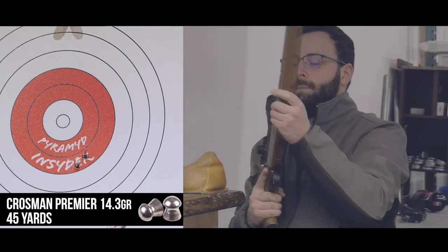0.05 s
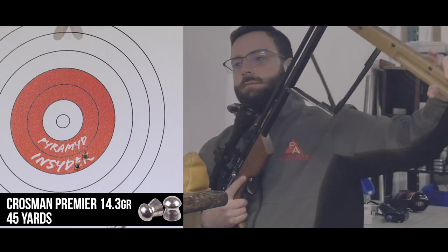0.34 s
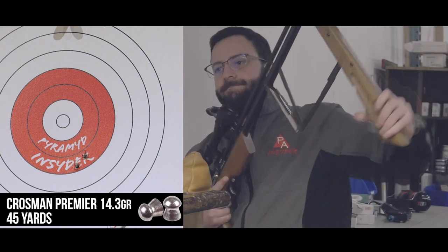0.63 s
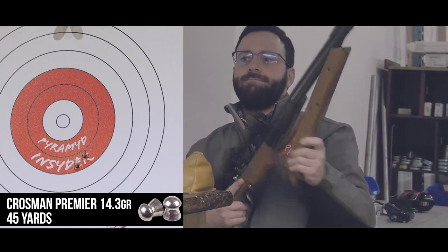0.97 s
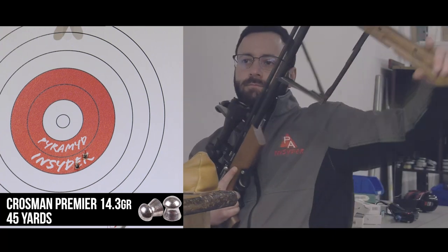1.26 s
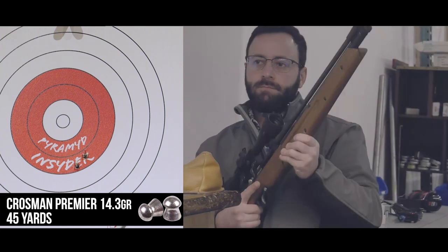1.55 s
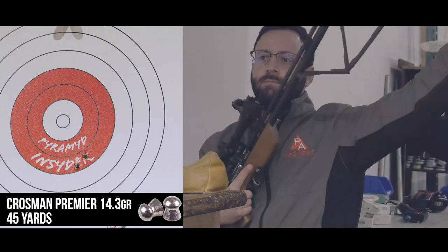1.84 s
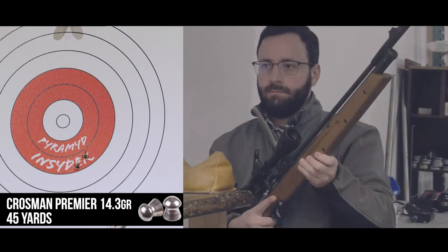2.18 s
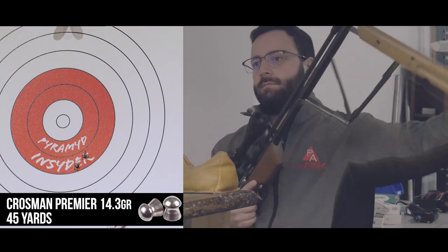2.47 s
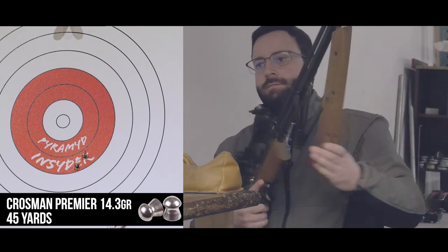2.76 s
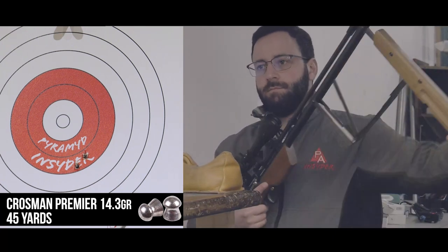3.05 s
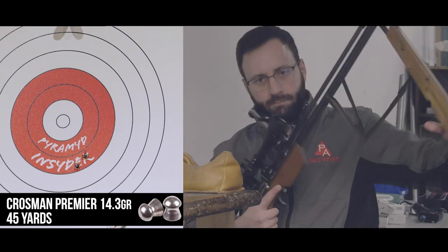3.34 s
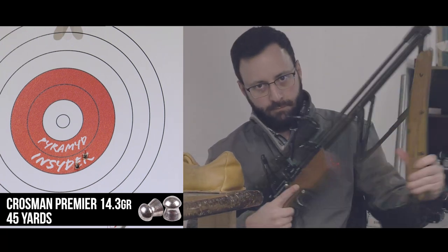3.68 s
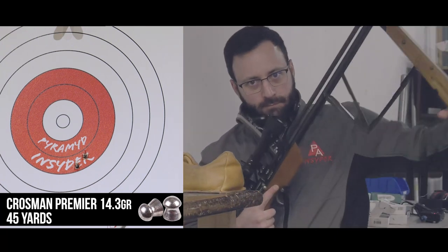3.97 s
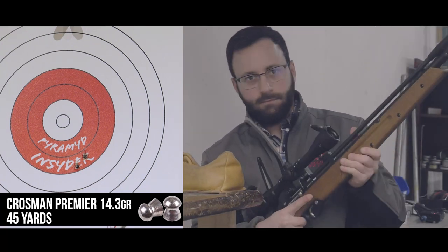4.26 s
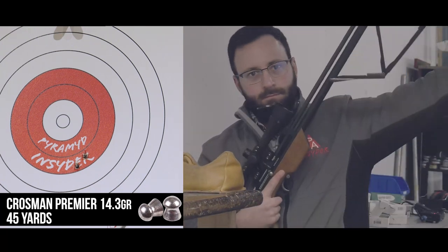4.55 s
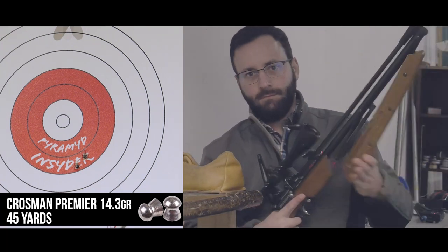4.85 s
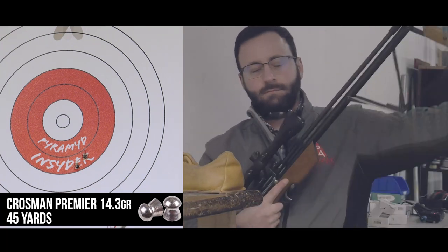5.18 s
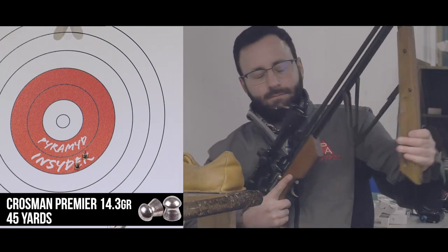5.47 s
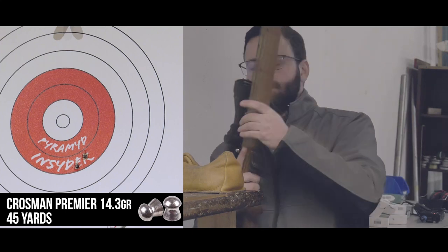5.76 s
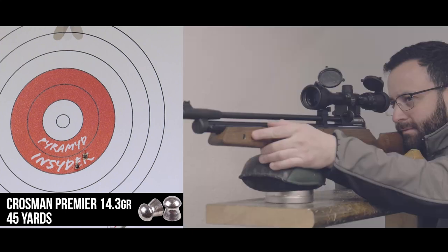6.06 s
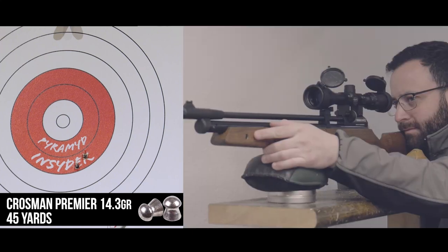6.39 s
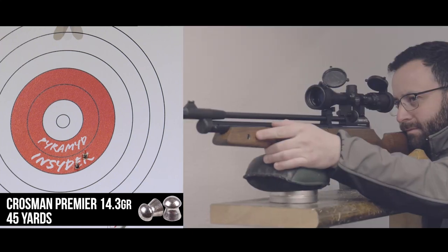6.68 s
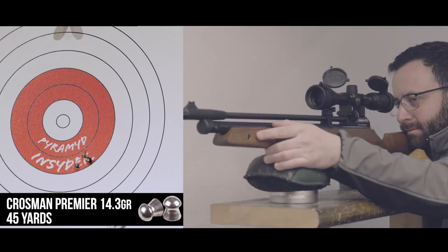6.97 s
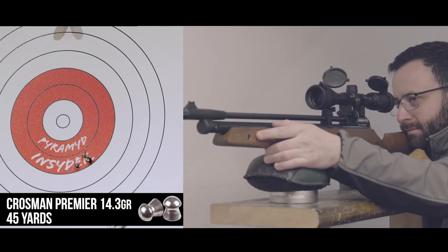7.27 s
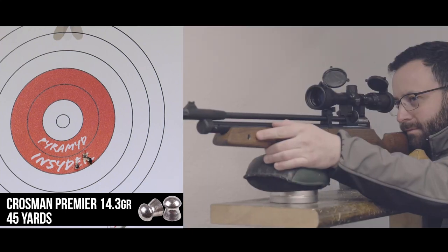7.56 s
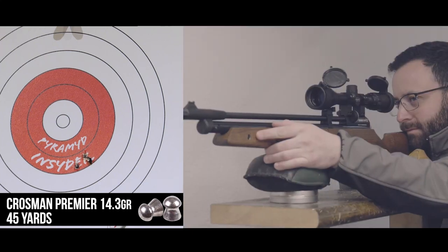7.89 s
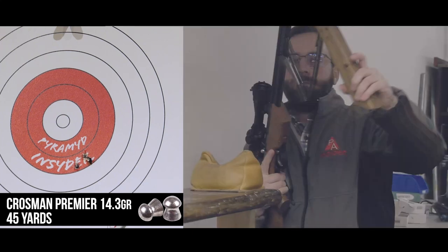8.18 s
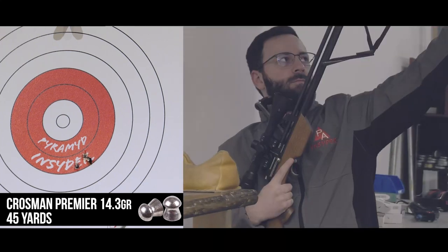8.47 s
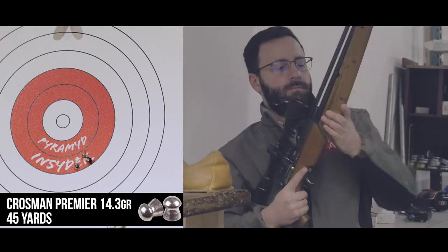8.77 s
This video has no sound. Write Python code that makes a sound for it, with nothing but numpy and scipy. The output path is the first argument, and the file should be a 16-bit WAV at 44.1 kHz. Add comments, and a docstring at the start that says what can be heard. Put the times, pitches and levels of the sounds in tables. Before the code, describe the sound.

An air rifle is pumped eight times, close by in a small room, from about 0.2 to 5.7 seconds, roughly one stroke every 0.7 seconds. In each stroke the lever snaps open, its steel links tick, it clacks against its stop, then the wooden grip slaps shut more loudly with a short, faintly whistling rush of air. Soft dull knocks come around 6 seconds, then a brief lull. At 6.8 seconds the rifle fires with a sharp pop, followed at 7 by the pellet's crack on the target. These are the loudest sounds, ringing and booming down a long indoor range. A distant trap clangs at 7.2, and light knocks follow around 7.5. At 8.1 one more close pump begins with a thin metallic ping and slaps shut at 8.8. A jacket rustles faintly during the pumping, and soft ventilation runs throughout.

```python
"""Pumping and firing an air rifle

An air rifle is pumped eight times, close by in a small room: the lever is pried open, its links tick,
it hits its stop, then it slaps shut and air rushes through the valve. The scene cuts to the shooting
bench, where one shot rings down a long indoor range; the pellet cracks on the target and clangs into
the far trap. Then it cuts back for one more pump. Clothes rustle and the ventilation blows softly."""
import sys
import numpy as np
from scipy import signal
from scipy.fft import rfft, irfft, next_fast_len
from scipy.io import wavfile
from scipy.ndimage import uniform_filter1d

SR = 44100
rng = np.random.default_rng(int(sys.argv[2]) if len(sys.argv) > 2 else 0)


def bounce(signal):
    """Save signal as a 16-bit WAV file at the path given by the first command-line argument."""
    frames = np.transpose(np.atleast_2d(signal))
    limited = np.clip(frames, -1, 1)
    pcm = np.round(limited * 32767).astype(np.int16)
    wavfile.write(sys.argv[1], SR, pcm)


N = 398223
TIME = np.arange(N) / SR
BENCH_FROM_S, BENCH_TO_S = 6.09, 8.125
CUTOFF_HZ = 16000

# A "t60" is the time a sound takes to fade by 60 dB. A higher "tilt" makes it brighter.
# Levels are starting points: the functions add their own gains and filters.
# The lever snaps out of its seat: (time [s], crack [dB], ring [dB], tilt [dB/octave],
# creak before it [s], delay of the link tick [s], tick [dB])
PRIES = [(0.2255, -28, -40, 0.5, 0.00052, .058, -53), (1.0326, -30, -42, -1, 0.036, 0.058, -35.5),
         (1.686, -29.5, -36, -1, 0.015, 0.08, -34.5), (2.3958, -25.5, -37.5, 2.5, 0.01, .078, -35.5),
         (3.0299, -22, -37.5, 4, 0.0085, .07, -34), (3.7219, -24.5, -35, 1, .01, 0.085, -34.5),
         (4.4089, -25.5, -34, 2.5, .007, .085, -34), (5.1121, -24.5, -34.5, 3.5, 0.0067, 0.081, -34),
         (8.1341, -27.5, -39, 3.5, 0, .058, -54)]
# The lever is fully open, and the slack links touch, then rebound: (time [s], crack [dB], ring [dB],
# tilt [dB/octave], delay of the rebound [s], touch [dB], rebound [dB])
STOPS = [(0.4805, -26.5, -27.5, 0.5, 0.12, -59, -38.5), (1.2049, -28.5, -32.5, 0.5, 0.081, -46, -36),
         (1.8714, -30, -31, 0.9, 0.076, -61, -36.5), (2.5712, -27.5, -32, 0.7, 0.079, -66, -44.5),
         (3.225, -28.5, -34, 0.6, .079, -57.5, -44), (3.887, -27, -30.5, 0.1, 0.059, -64, -43),
         (4.5902, -29.5, -35, 0.2, .0774, -63, -42), (5.2762, -28, -30.5, 0.5, 0.064, -43.5, -42),
         (8.4471, -33, -36.5, 0, 0.16, -74, -47)]
# The lever's wooden grip, the forearm, slaps shut: (time [s], crack [dB], ring [dB], tilt [dB/octave],
# link tick [dB], head start of the linkage [s], linkage [dB], knock [dB], valve [dB], valve hold [s])
CLOSES = [(0.8087, -26, -24.5, 2.5, -43, 0.0095, -18.5, -46, -44.5, 0.028),
          (1.4731, -18.5, -27.5, 2, -61, 0.0077, -20.5, -43, -46.5, .065),
          (2.1619, -19, -25.5, 0, -54, 0.01, -22.5, -39.5, -45, 0.028),
          (2.8601, -16.5, -29.5, 0.5, -52.5, 0.011, -23.5, -40, -45, 0.054),
          (3.5501, -17, -25.5, 1.5, -48, 0.0069, -21.5, -30.5, -46, 0.07),
          (4.2173, -14.5, -28, 0, -54, 0.0099, -24.5, -63, -46, 0.057),
          (4.9323, -22, -29.5, -1, -54.5, .0103, -19, -65, -45.5, 0.033),
          (5.6368, -14.5, -36, -2.5, -56, 0.007, -22, -35, -47.5, 0.071),
          (8.844, -21, -25, -1, -61, .015, -24.5, -64, -50.5, .019)]
# The first pull for each shot sets a steel part singing: (time [s], level [dB])
PINGS = [(0.226, -47), (8.135, -38)]
# The muzzle pops (first two rows), then the pellet hits the target (last two rows):
# (time [s], level [dB], t60 [s], tilt [dB/octave])
MUZZLE_AND_TARGET = [(6.8408, -15, 0.025, 2.5), (6.8447, -13.5, 0.026, 2), (6.9845, -11.5, 0.015, 2.5),
                     (6.9875, -25.5, 0.12, 3.5)]
# The shot slaps back from the near walls: (time [s], level [dB], t60 [s])
WALL_SLAPS = [(6.8595, -18.5, 0.04), (6.8625, -19, 0.084)]
# Pressure waves under the pop, the wall slap and the target hit:
# (time [s], level [dB], pitch [Hz], t60 [s])
BLASTS = [(6.8414, -11, 570, 0.01), (6.8607, -7, 1220, 0.0058), (6.985, -14, 416, 0.01)]
# The jacket rustles as the rifle is raised and lowered: (time [s], level [dB])
JACKET_RUSTLE = [(0, -68), (.1, -63.5), (.35, -68.5), (.9, -71), (5.4, -68.5), (5.75, -63.5), (5.93, -68),
                 (6.07, -66), (8.17, -62), (8.6, -73.5), (8.85, -62), (9.02, -85)]
# Sleeve and hand brush the stock: (time [s], level [dB], half length [s])
BRUSHES = [(0.176, -56, 0.0081), (0.322, -61, 0.0036), (0.354, -56.5, 0.0042), (0.387, -52, 0.0073),
           (0.455, -55.5, 0.017), (8.299, -52, 0.02), (8.337, -57.5, 0.0092)]
# Dull knocks on the bench and around the range: (time [s], level [dB], t60 [s], tilt [dB/octave])
KNOCKS = [(5.981, -43.5, 0.11, -0.5), (5.99, -48.5, 0.13, -2), (6.068, -51, 0.062, 4.5),
          (7.474, -53, 0.12, 9), (7.53, -45, 0.17, 8.5), (7.662, -57, 0.11, 9)]

# The tone of each sound, or how strong it is from bass to treble: (frequency [Hz], level [dB])
PRY_TONE = [(120, -64), (200, -41.5), (401, -19.5), (836, -15), (1060, -5.5), (1450, -11), (2420, -3.5),
            (4270, 0), (4860, -1.5), (7410, -5.5), (9580, -2.5), (14600, -4.5), (16000, -19.5)]
LINK_TONE = [(180, -47), (300, -9.5), (774, -10.5), (1140, 9), (1530, -9), (2400, 4.5), (3030, -6),
             (4230, 0.5), (6300, -6), (10900, -10.5), (14500, -5), (16000, -16.5)]
STOP_TONE = [(120, -52), (200, -19), (749, -8), (968, -11), (1180, 1.5), (1710, -4.5), (2130, -7),
             (2330, -1), (3690, -8), (5630, -7), (7270, -3), (9750, -8), (14900, -13.5), (16000, -20)]
CLOSE_TONE = [(150, -48), (250, -31.5), (831, -13.5), (1260, -4), (1790, -7.5), (3060, -1), (3910, -8.5),
              (4340, 1), (5350, -6.5), (5830, -2.5), (7570, -6.5), (9830, -3.5), (13900, -10), (16000, -18)]
VALVE_TONE = [(240, -54.5), (400, -23), (504, -23), (553, 4), (645, -26), (708, -5), (814, -13.5),
              (879, -5.5), (1650, -8), (3930, -1), (9470, -9.5), (13300, -18.5), (16000, -24.5)]
CRACK_TONE = [(18, -39), (30, -32), (584, 2.5), (1540, -6.5), (2290, -3.5), (3060, -10), (3400, -13),
              (4650, -8), (5450, -16.5), (6900, -11), (9460, -25.5), (10500, -25), (16000, -31)]
WALL_TONE = [(24, -43.5), (40, -13), (231, -6), (600, -2.5), (715, -19), (1070, 1.5), (1590, 1.5),
             (2440, -7), (2630, -6), (3930, -19.5), (5440, -10.5), (16000, -50)]
RANGE_TONE = [(35, -43.5), (60, -26), (193, -3), (308, -3.5), (363, -4), (566, -6), (991, -6.5),
              (1410, -3.5), (1950, -6), (2250, -6.5), (2970, -11.5), (5460, -12), (6430, -15),
              (16000, -41.5)]
BOOM_TONE = [(29, -63), (50, -34.5), (75, -32.5), (151, -6.5), (231, -4.5), (338, 4), (380, 1), (427, -11),
             (492, -1), (701, -7), (1530, -5.5), (2560, -8), (4010, -10), (7410, -22.5), (14000, -49)]
TRAP_TONE = [(240, -41), (400, -13.5), (593, -11.5), (690, -16), (780, -10), (1020, -10), (1140, -6),
             (1910, -4), (2250, -3.5), (3240, -9.5), (3770, -6.5), (6820, -15), (15000, -52.5)]
BRUSH_TONE = [(290, -31), (500, -5), (1280, -1), (1360, -6), (1750, 2), (3000, -4.5), (7100, -10.5),
              (16000, -14)]
KNOCK_TONE = [(100, -28), (300, -5.5), (600, -4), (1000, 4.5), (1600, -9.5), (4000, -24), (9000, -44.5),
              (15000, -70)]
ROOM_AIR_TONE = [(15, -39), (25, -5.5), (242, 3.5), (405, -0.5), (531, 5.5), (624, 0.5), (714, 3.5),
                 (863, 0), (988, -0.5), (1790, -7), (2480, -7), (3430, -20.5), (4490, -21.5), (14000, -18),
                 (16000, -48.5)]
BENCH_AIR_TONE = [(15, -52), (25, -21), (113, -9.5), (231, -10.5), (353, -8.5), (448, -15.5), (539, -12.5),
                  (584, -10), (632, -16), (684, -16), (824, -17), (1130, -21.5), (1230, -17.5), (1360, -21),
                  (14000, -49)]

# Notes that ring in the steel links, the closed rifle and the singing part. Narrow ones last longer:
# (pitch [Hz], width before damping [Hz], level [dB])
LINK_NOTES = [(1169, 43, -2.5), (1400, 31, -1.5), (1700, 44, -1.5), (1950, 41, -3.5), (2210, 140, -1.5),
              (3157, 140, 3), (3430, 39, -5), (3660, 140, 4), (4180, 17, -10.5), (4240, 40, -6.5),
              (5080, 100, -4), (5470, 71, -10), (6720, 13.3, -16), (6500, 59, -11), (7080, 120, -4.5),
              (7560, 54, -9), (8520, 100, -1), (9500, 10, -16.5), (9200, 140, -5.5), (9400, 45, -13)]
BODY_NOTES = [(1297, 110, -3.5), (2335, 49, -3.5), (2550, 29, -5), (2820, 60, 0), (3010, 150, 6.5),
              (3700, 46, 1), (4300, 500, 6), (4683, 100, 5), (4940, 120, 2.5), (5796, 480, 2.5),
              (6550, 98, -2.5), (8730, 99, -5.5)]
PING_NOTES = [(2430, 40, 3), (2650, 18, -1), (5870, 45, -10), (9410, 36, 0)]
# Notes of the air in the valve passage and across the range: (pitch [Hz], width [Hz], level [dB])
VALVE_NOTES = [(578, 48, -0.5), (883, 70, -6), (2570, 100, -0.5), (2800, 57, 3), (3090, 67, -4.5),
               (3550, 55, 0), (3860, 76, 0.5), (4677, 110, -9.5), (5040, 140, -8)]
RANGE_NOTES = [(166.6, 30, -3), (230, 18, -6.5), (269.5, 18, 2.5), (309, 24, -5), (363, 18.3, 1.5),
               (482, 18, -5.5)]

# How long sound lingers in each space: (frequency [Hz], t60 [s])
VALVE_DECAY = [(500, 0.54), (3000, 0.66), (7000, 0.46), (14000, 0.33)]
RANGE_DECAY = [(100, 1.77), (400, 0.38), (1500, 0.97), (5000, 0.96), (9000, 0.79), (14000, .35)]
TRAP_DECAY = [(500, 0.73), (1500, 0.3), (5000, 0.45), (12000, 0.23)]
ROOM_DECAY = [(200, 0.15), (2000, 0.46), (6000, 0.27), (14000, 0.087)]

# How wide each sound is in stereo: (frequency [Hz], sides against middle [dB])
RIFLE_SPREAD = [(200, 2), (600, -11.5), (1500, -33), (2700, -22.5), (5500, -10.5), (15000, -11)]
CRACK_SPREAD = [(300, 0), (1000, 0.5), (3000, -2.5), (7000, -7.5), (11000, 10), (15000, 2)]
WALL_SPREAD = [(200, -11), (1000, -18.5), (5000, -10)]


def lever_pry(slip_count=3, free_after_s=0.0055):
    """The catch creaks in small slips, snaps and springs free. A first pull has little or no creak."""
    hits = []
    for s, crack_db, ring_db, tilt, creak_s, *_ in PRIES:
        hits.append((s, crack_db, ring_db, tilt))
        if creak_s > 0:
            slips = np.linspace(s - creak_s, s, slip_count, endpoint=False)
            hits += [(slip, crack_db - 13.5, ring_db - 7, -0.95) for slip in slips]
            hits.append((s + free_after_s, crack_db - 7.5, ring_db, -0.46))
    return contacts(hits, PRY_TONE, BODY_NOTES, crack_t60=0.02, crack_tilt=0.97, clatter_t60=0.12,
                    clatter_tilt=-2.8, clatter_db=0.5, notes_db=-3.5, damping=0.42, scrape_db=-16)


def link_ticks(touch_share=0.665, before_slap_s=0.056):
    """The links tick when their load changes: after the pry, twice after the stop, before the slap."""
    ticks = [(s + delay, db) for s, *_, delay, db in PRIES]
    for s, *_, delay, touch_db, rebound_db in STOPS:
        ticks += [(s + touch_share * delay, touch_db), (s + delay, rebound_db)]
    ticks += [(s - before_slap_s, db) for s, _, _, _, db, *_ in CLOSES]
    hits = [(s, db, db - 5.5, 1.5) for s, db in ticks]
    return contacts(hits, LINK_TONE, LINK_NOTES, crack_t60=0.019, crack_tilt=0.44, clatter_t60=0.071,
                    clatter_tilt=0, clatter_db=4.5, notes_db=-5, damping=0.22, scrape_db=-15.5)


def lever_stop():
    """The lever clacks against its stop at the end of each opening swing."""
    hits = [row[:4] for row in STOPS]
    return contacts(hits, STOP_TONE, LINK_NOTES, crack_t60=0.015, crack_tilt=1, clatter_t60=0.068,
                    clatter_tilt=-0.3, clatter_db=2, notes_db=-7, damping=0.4, scrape_db=-25)


def lever_close():
    """The lever shuts with two quick hits: first the steel linkage, then the wooden forearm."""
    hits = []
    for s, crack_db, ring_db, tilt, _, head_start_s, linkage_db, *_ in CLOSES:
        hits.append((s - head_start_s, linkage_db, linkage_db - 6.5, 1))
        hits.append((s, crack_db, ring_db, tilt))
    return contacts(hits, CLOSE_TONE, BODY_NOTES, crack_t60=0.0094, crack_tilt=1, clatter_t60=0.084,
                    clatter_tilt=-1.3, clatter_db=-1, notes_db=3, damping=0.99, scrape_db=-26)


def contacts(hits, tone, notes, crack_t60, crack_tilt, clatter_t60, clatter_tilt, clatter_db,
             notes_db, damping, scrape_db, size=8192):
    """Hard parts meet: a brief scrape, a bright crack, then an uneven clatter and a few clear notes."""
    out, lead = np.zeros((2, N)), size // 32
    notes = [(hz, np.clip(width, 55, 95), db) for hz, width, db in notes]   # hands damp all about alike
    for s, crack_db, ring_db, tilt in hits:
        scrape = noise(tone, lead, tilt) * np.linspace(0, 1, lead)
        hit_tone = uneven_tone(tone)
        crack = noise(hit_tone, size, tilt + crack_tilt) * fade(crack_t60, size)
        clatter = noise(hit_tone, size, tilt + clatter_tilt) * fade(clatter_t60, size)
        clatter *= flutter(600, 2.4, size)
        ring = from_db(clatter_db) * clatter + from_db(notes_db) * struck(notes, damping, size)
        ring *= fade_in(0.015, size)
        add(out, s - lead / SR, from_db(crack_db + scrape_db) * scrape)
        add(out, s, from_db(crack_db + 2.5) * crack + from_db(ring_db) * ring)
    return out


def forearm(knock_hz=470, knock_t60=0.0034, push_s=0.0065, push_db=-59, size=2048):
    """The wood lands with a soft, low push and a very short hollow knock."""
    out, t = np.zeros((2, N)), TIME[:size]
    knock = low_cut(np.sin(2 * np.pi * knock_hz * t) * t * fade(knock_t60, size), hz=215)
    push = np.sin(np.pi * np.minimum(t / push_s, 1))
    for s, *_, knock_db, _, _ in CLOSES:
        add(out, s, from_db(knock_db) * knock / abs(knock).max() + from_db(push_db) * push)
    return out


def steel_ping():
    """A steel part gives a thin ring on the first pull for each shot."""
    out = np.zeros((2, N))
    for s, db in PINGS:
        add(out, s, from_db(db) * struck(PING_NOTES, damping=0.99, size=8192))
    return out


def valve(opens_after_s=0.005, shuts_after_s=0.18, whistle_db=-5, size=16384):
    """Squeezed air sputters into the rifle's tank and makes the passage sing until the valve shuts."""
    out, t = np.zeros((2, N)), TIME[:size]
    opening = 1 / np.hypot(1, (t / shuts_after_s) ** 5)
    for s, *_, db, hold_s in CLOSES:
        hiss = wash(VALVE_TONE, VALVE_DECAY, 0.004, hold_s, size) * flutter(140, 1.3, size)
        flow = from_db(-130 * np.maximum(t - hold_s, 0)) * fade_in(0.06, size)
        # Each stroke brings out different notes.
        notes = [(hz, width, level + 2 * rng.standard_normal()) for hz, width, level in VALVE_NOTES]
        whistle = from_db(whistle_db) * singing_noise(notes, size) * flow
        add(out, s + opens_after_s, from_db(db) * opening * (hiss + whistle))
    return out


def shot_and_target(hiss_s=6.832, size=8192):
    """The muzzle pops, near walls slap back, then a sharp crack follows as the pellet hits the target."""
    out = np.zeros((2, N))
    for s, db, hz, t60 in BLASTS:
        wave = np.sin(2 * np.pi * hz * TIME[:size]) * fade(t60, size)
        add(out, s, from_db(db) * low_cut(wave, hz=60))
    for s, db, t60, tilt in MUZZLE_AND_TARGET:
        add(out, s, from_db(db) * noise(CRACK_TONE, size, tilt, CRACK_SPREAD) * fade(t60, size))
    for s, db, t60 in WALL_SLAPS:
        slap = noise(WALL_TONE, size, spread=WALL_SPREAD) * fade(t60, size) * fade_in(0.002, size)
        add(out, s, from_db(db) * slap)
    # A faint, bright hiss starts just before the pop and fades under it.
    add(out, hiss_s, from_db(-45.5) * noise(RANGE_TONE, size, tilt=2) * fade(0.23, size))
    return out


def range_boom(ring_s=6.845, boom_s=6.985, size=65536):
    """The long range rings and booms, while waves caught between its walls build up and die away."""
    out, t = np.zeros((2, N)), TIME[:size // 2]
    add(out, ring_s, from_db(-33) * wash(RANGE_TONE, RANGE_DECAY, rise_s=0.0058, hold_s=0.14, size=size))
    add(out, boom_s, from_db(-33.5) * wash(BOOM_TONE, RANGE_DECAY, rise_s=0.014, hold_s=0.11, size=size))
    swell = (t / 0.085) * np.exp(1 - t / 0.072)
    add(out, boom_s, from_db(-39.5) * singing_noise(RANGE_NOTES, len(t)) * swell)
    return out


def pellet_trap(heard_s=7.198, size=8192):
    """The pellet hits the trap, and the clang comes back from the far end of the range."""
    out = np.zeros((2, N))
    clang = wash(TRAP_TONE, TRAP_DECAY, rise_s=0.0052, hold_s=0.053, size=4 * size)
    impact = noise(TRAP_TONE, size, tilt=-1.8) * fade(0.04, size) * fade_in(0.002, size)
    add(out, heard_s, from_db(-30) * clang)
    add(out, heard_s, from_db(-24) * impact)
    return out


def piston_and_jacket(opening_db=-65.5, closing_db=-71.5):
    """One soft hiss follows the sliding piston and, away from the bench, the rustling jacket."""
    piston = from_db(opening_db) * swing(PRIES, STOPS) + from_db(closing_db) * swing(STOPS, CLOSES)
    rustle = from_db(np.interp(TIME, *np.transpose(JACKET_RUSTLE))) * (1 - at_bench())
    return np.hypot(piston, rustle) * noise([(2000, 1), (5000, 0), (10000, -2.5), (15000, -7)], N)


def brushing(grip_before_s=0.035, grip_db=-60, grip_half_s=0.013):
    """Cloth catches and lets go on the stock, and the hand slides on the forearm before every slap."""
    grips = [(s - grip_before_s, grip_db, grip_half_s) for s, *_ in CLOSES]
    swells = sum(from_db(db) * np.exp(-((TIME - s) / half) ** 2 / 2) for s, db, half in BRUSHES + grips)
    return swells * noise(BRUSH_TONE, N) * flutter(per_second=250, depth_db=3, size=N)


def bench_knocks(size=16384):
    """Things knock dully on the bench and around the range."""
    out = np.zeros((2, N))
    for s, db, t60, tilt in KNOCKS:
        add(out, s, from_db(db) * noise(KNOCK_TONE, size, tilt) * fade(t60, size) * fade_in(0.002, size))
    return out


def far_wall(sound, delay_s=0.13, echo_db=-31.5, smear_t60=0.053, size=4096):
    """A distant wall sends back one soft, smeared echo."""
    out = np.zeros((2, N))
    smear = noise([(300, -4), (6000, 13), (15000, -23)], size) * fade(smear_t60, size)
    add(out, delay_s, from_db(echo_db) * with_tail(sound, smear))
    return out


def small_room(sound, echo_db=-16):
    """Many echoes from the small room blend into a faint, short tail."""
    tone = [(150, 10), (1000, 3), (5000, -1), (15000, 4.5)]
    tail = wash(tone, ROOM_DECAY, rise_s=0.0052, hold_s=0, size=16384)
    return from_db(echo_db) * with_tail(sound, tail)


def ventilation(room_db=-63, bench_db=-63.5):
    """Moving air makes a steady noise, duller at the bench."""
    bench, spread = at_bench(), [(100, -10.5), (10000, -8)]
    room_air = from_db(room_db) * noise(ROOM_AIR_TONE, N, spread=spread)
    bench_air = from_db(bench_db) * noise(BENCH_AIR_TONE, N, spread=spread)
    return (1 - bench) * room_air + bench * bench_air


def at_bench():
    """1 while the scene is at the bench, otherwise 0, with a quick blend between."""
    return uniform_filter1d(((TIME > BENCH_FROM_S) & (TIME < BENCH_TO_S)) * 1., size=256)


def swing(starts, ends):
    """The lever's speed, from 0 to 1: it rises and falls between one contact and the next."""
    speed = np.zeros(N)
    for (start, *_), (end, *_) in zip(starts, ends):
        moving = (TIME > start) & (TIME < end)
        speed[moving] = np.sin(np.pi * (TIME[moving] - start) / (end - start))
    return speed


def uneven_tone(tone, uneven_db=3, count=70):
    """The tone of one blow: where it lands decides which pitches stand out."""
    hz = np.geomspace(tone[0][0], CUTOFF_HZ, count)
    return np.column_stack([hz, at_hz(tone, hz) + uneven_db * rng.standard_normal(count)])


def struck(notes, damping, size):
    """A blow sets notes ringing, each with a random strength. More damping stops them sooner."""
    hz, width, db = np.array(notes).T[:, :, None]
    strength, t = from_db(db + 3 * rng.standard_normal(hz.shape)), TIME[:size]
    waves = np.sin(2 * np.pi * (hz * t + rng.random(hz.shape)))
    rings = strength * waves * np.exp(-np.pi * damping * width * t)
    return rings.sum(axis=0) / np.sqrt(np.sum(strength ** 2) / 2)


def singing_noise(notes, size):
    """Noise that is strong only near the given notes."""
    hz = np.fft.rfftfreq(size, 1 / SR)
    peaks = sum(from_db(db) / (1 + 2j * (hz - centre) / width) ** 2 for centre, width, db in notes)
    return unit_level(irfft(peaks * np.exp(2j * np.pi * rng.random(len(hz))), size))


def noise(tone, size, tilt=0, spread=RIFLE_SPREAD):
    """Stereo noise with the given tone, tilted above 700 Hz."""
    padded = next_fast_len(size)
    hz = np.fft.rfftfreq(padded, 1 / SR) + 1
    gain = from_db(at_hz(tone, hz) + tilt * np.log2(np.maximum(hz, 700)))
    gain /= np.hypot(1, (tone[0][0] / hz) ** 2)   # falls away below the tone's lowest frequency
    middle, side = gain * np.exp(2j * np.pi * rng.random((2, len(hz))))
    left_right = middle + from_db(at_hz(spread, hz)) * side * [[1], [-1]]
    return unit_level(irfft(left_right, padded)[:, :size])


def wash(tone, decay, rise_s, hold_s, size):
    """Noise that swells, holds, then dies away, each octave at its own pace."""
    t, octave = TIME[:size], np.log2(np.fft.rfftfreq(size, 1 / SR) + 1)
    spread = [(100, -3.5), (700, -24), (3000, -16), (10000, -3.5)]
    spectrum, out = rfft(noise(tone, size, spread=spread)), 0
    for k in range(5, 16):
        band = irfft(spectrum * np.maximum(1 - abs(octave - k), 0), size)
        out = out + band * from_db(-60 * np.maximum(t - hold_s, 0) / at_hz(decay, 2. ** k))
    return out * (1 - np.exp(-t / rise_s))


def flutter(per_second, depth_db, size):
    """A volume that wobbles at random."""
    steps = TIME[:size] * per_second
    return unit_level(from_db(depth_db * np.interp(steps, np.arange(size), rng.standard_normal(size))))


def with_tail(sound, tail):
    """Gives every moment of a sound the same tail of echoes."""
    return signal.fftconvolve(sound, tail / np.sqrt(np.sum(tail ** 2) / 2), axes=1)[:, :N]


def low_cut(sound, hz):
    """Turns down the bass, because small parts give off little of it."""
    return signal.sosfilt(signal.butter(2, hz, "high", fs=SR, output="sos"), sound + 1e-18)


def fade(t60, size):
    """A volume that falls by 60 dB every t60 seconds."""
    return from_db(-60 * TIME[:size] / t60)


def fade_in(seconds, size):
    """A volume that rises from 0 to almost 1 in the given time."""
    return 1 - fade(seconds, size)


def at_hz(table, hz):
    """Reads a table between its rows, with the octaves evenly spaced."""
    table = np.array(table)
    return np.interp(np.log(hz), np.log(table[:, 0]), table[:, 1])


def from_db(db):
    """Turns decibels into a number to multiply by."""
    return 10 ** (np.asarray(db) / 20)


def unit_level(sound):
    """Scales a sound to an average (rms) level of 1."""
    return sound / np.sqrt(np.mean(sound ** 2) + 1e-20)


def add(out, s, sound):
    """Mixes a sound in, starting at s seconds."""
    start = int(round(s * SR))
    out[:, start:start + sound.shape[-1]] += sound[..., :N - start]


def scene():
    """The pumping in its room, the shot on the range, and the quiet sounds around them."""
    clicks = lever_pry() + link_ticks() + lever_stop()
    slaps = lever_close()
    lever = low_cut(clicks + slaps + far_wall(slaps), hz=285)
    pumping = lever + forearm() + steel_ping() + valve()
    room = small_room(pumping)
    handling = piston_and_jacket() + brushing() + bench_knocks()
    firing = shot_and_target() + range_boom() + pellet_trap()
    return pumping + room + handling + firing + ventilation()


def record(dry):
    """Rounds off the loudest peaks and cuts the highest treble."""
    ceiling = 0.33
    rounded = dry / (1 + (dry / ceiling) ** 4) ** (1 / 4)
    return signal.sosfiltfilt(signal.ellip(8, .1, 50, CUTOFF_HZ, fs=SR, output="sos"), rounded)


dry = scene()
out = record(dry)
bounce(out)
```